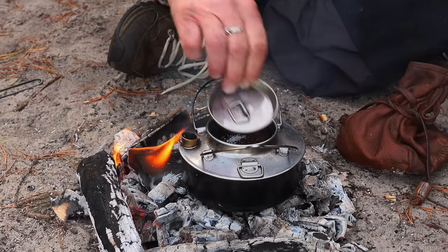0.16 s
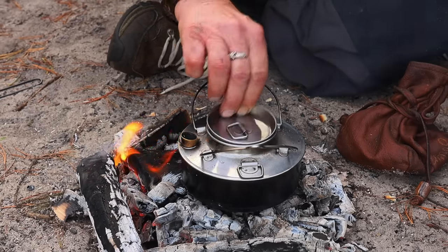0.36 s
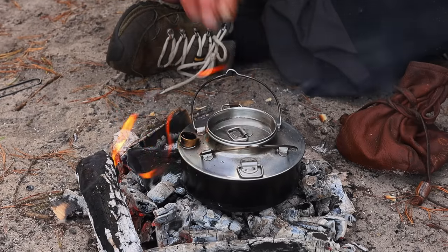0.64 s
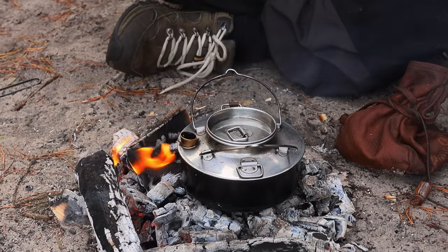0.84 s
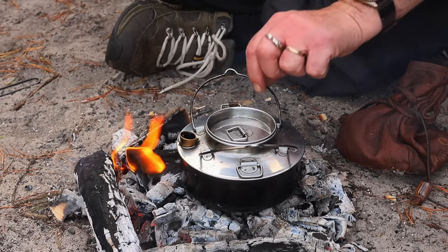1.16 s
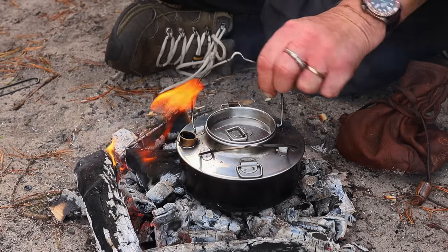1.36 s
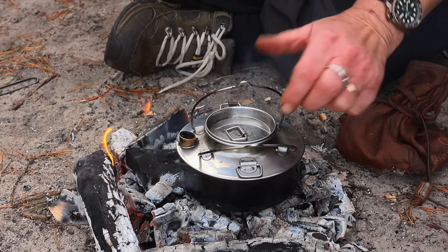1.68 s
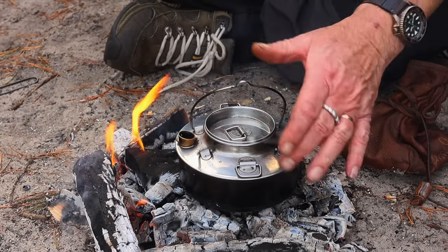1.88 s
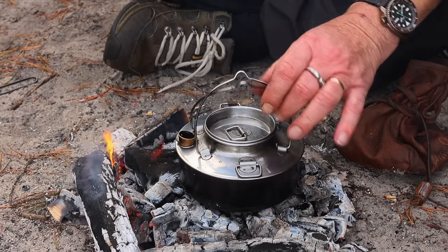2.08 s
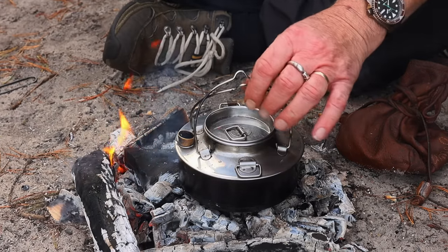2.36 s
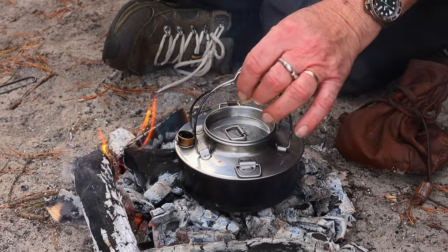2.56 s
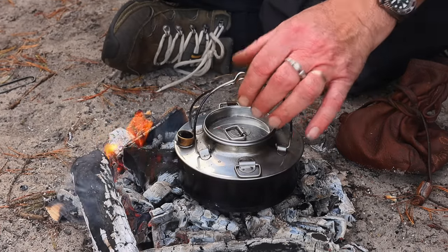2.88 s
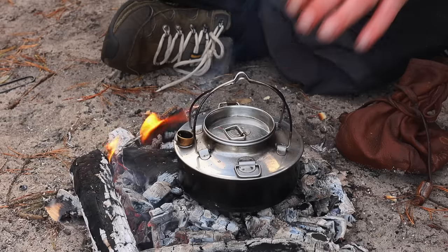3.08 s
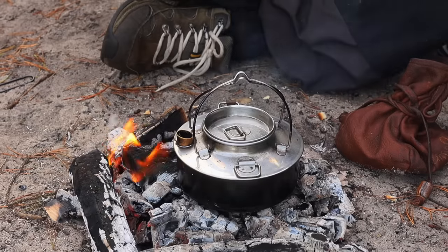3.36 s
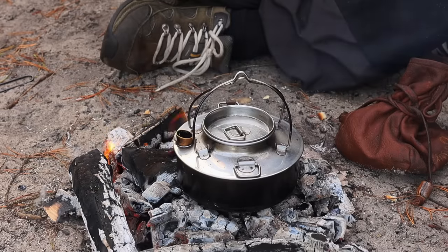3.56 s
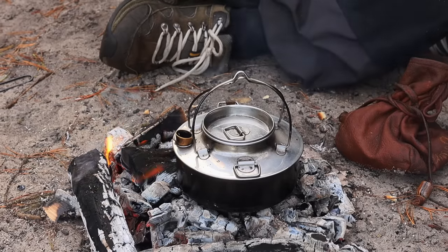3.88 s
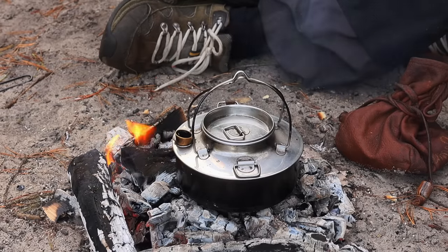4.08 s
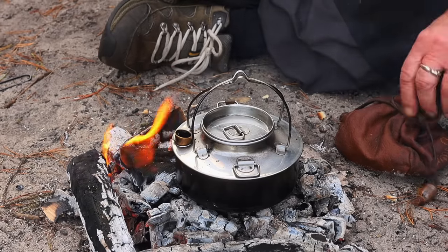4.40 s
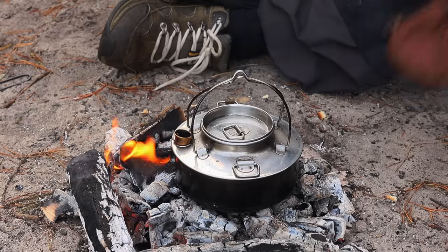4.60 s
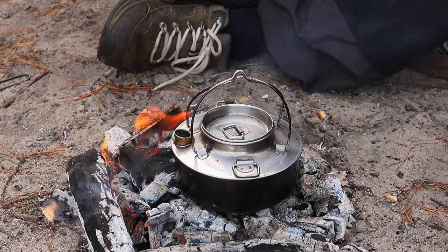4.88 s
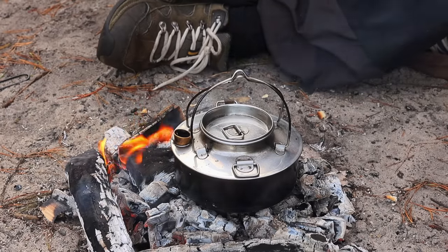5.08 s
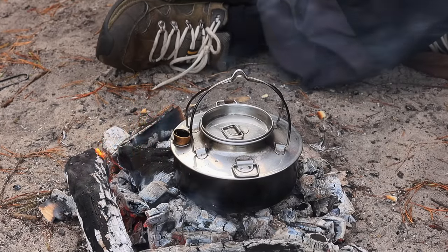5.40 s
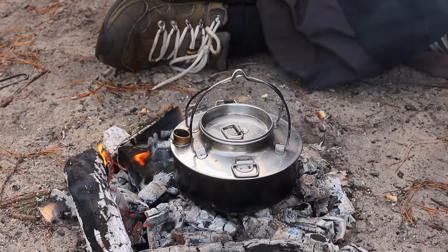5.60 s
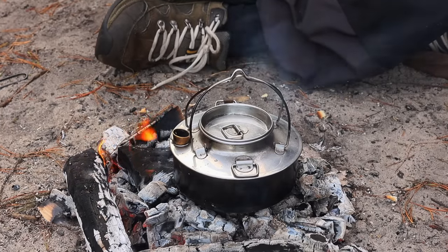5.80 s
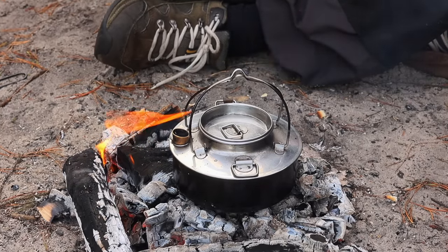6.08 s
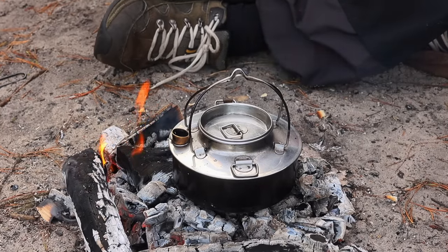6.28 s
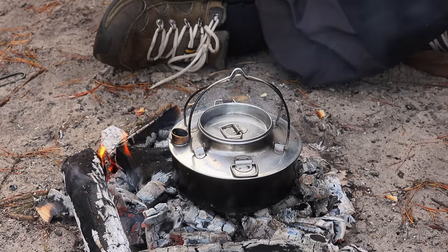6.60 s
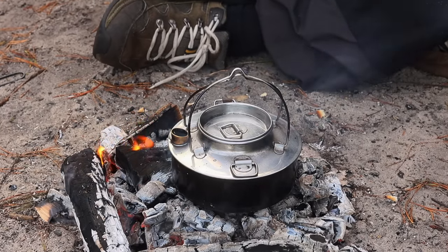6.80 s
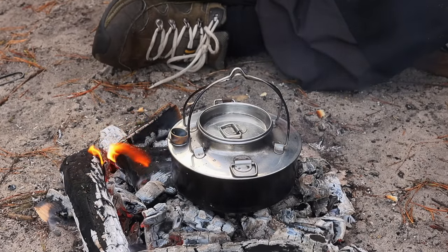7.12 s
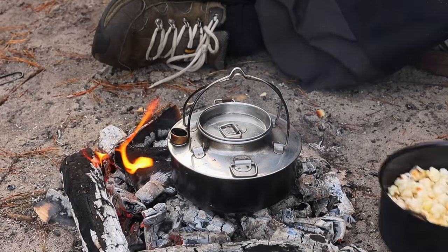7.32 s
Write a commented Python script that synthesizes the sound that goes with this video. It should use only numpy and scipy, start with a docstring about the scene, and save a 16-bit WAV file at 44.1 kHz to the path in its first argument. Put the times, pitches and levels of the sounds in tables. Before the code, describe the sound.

Outdoors, close and dry, one microphone faces a small campfire whose faint hiss, tiny ticks and soft low flame puffs continue throughout, with occasional thin high warbles. A brief cloth rub opens; at 0.27 s a steel lid clanks on a kettle, rattles lightly, then knocks and slides home around 0.46 s with a short rasp and hollow boom. Sleeves rustle at 0.8-1.3 s. Around 2.0-2.1 s the wire handle creaks faintly and clicks sharply, with another tick at 2.5 s and softer ones near 2.75 s. From 3.4 to 4.8 s trousers and a bag rustle, while sharp pops cluster at 3.95-4.5 s. Another rub comes at 5.4 s with deeper flame puffs, then crackles and a pop at 6.1-6.3 s. From 6.75 s until the end near 7.4 s, a metal pot drags over gritty sand, grating and clinking, amid a strong flame puff at 6.85 s.

```python
"""First a rub of cloth close by over a small campfire's faint hiss, then steel knocks of a kettle lid sliding home.
Outdoors, one microphone straight ahead: dense noise makes the cloth and hiss, brief pressure waves the flames.
Noise bursts make the sharp pops and crackles; collisions and friction feed the ringing modes of the kettle.
Its wire handle is flipped up with a faint creak, and at the end a popcorn pot is scraped along on sand."""
import sys
import numpy as np
from scipy import signal
from scipy.fft import rfft, irfft, next_fast_len
from scipy.io import wavfile

SR = 44100
rng = np.random.default_rng(int(sys.argv[2]) if len(sys.argv) > 2 else 0)


def inscribe(sig):
    """Save sig as 16-bit PCM at rate SR to the path in sys.argv[1].

    A 1-D sig is mono; a 2-D sig holds one channel per row.
    Samples are clipped to [-1, 1] before scaling.
    """
    pcm = np.round(np.clip(np.atleast_2d(sig).T, -1, 1) * 32767)
    wavfile.write(sys.argv[1], SR, pcm.astype(np.int16))


N = 328545
SHORT = 8192   # samples in one brief sound
AGE = np.arange(SHORT) / SR   # s since its start
TIME = np.arange(N) / SR   # s since the scene began


def from_db(db):
    """Amplitude for a level in dB."""
    return 10 ** (np.asarray(db) / 20)


def rms_one(x):
    """Scale to an rms of 1."""
    return x / np.sqrt(np.mean(x ** 2) + 1e-20)


def in_time(rows):
    """Columns of a curve, sample by sample."""
    s, *columns = np.transpose(rows)
    return [np.interp(TIME, s, column) for column in columns]


def add(track, s, sound):
    """Mix a sound in at a time."""
    at = int(np.clip(round(s * SR), 0, N - 1))
    track[at:at + len(sound)] += sound[:N - at]


def filtered(x, order, hz, kind):
    """Butterworth filter."""
    return signal.sosfilt(signal.butter(order, hz, kind, fs=SR, output="sos"), x)


def colour(x, points):
    """Causal (minimum-phase) filter through (f/Hz, level/dB) points."""
    size = 2 * next_fast_len(len(x) // 2 + 1)
    hz, db = np.transpose(points)
    bins = np.maximum(np.arange(size // 2 + 1) * SR / size, 1)
    log_gain = np.interp(np.log(bins), np.log(hz), db) * np.log(10) / 20
    cepstrum = irfft(log_gain)
    # folding the cepstrum forward in time gives minimum phase
    cepstrum[1:size // 2] *= 2
    cepstrum[size // 2 + 1:] = 0
    return irfft(rfft(x, size) * np.exp(rfft(cepstrum)))[:len(x)]


# Edges of the five bands that tone a blow (low, mid, high, bright, top): f/Hz
BAND_EDGES_HZ = [200, 800, 2400, 6000, 9500, 16000]


def band_centres(count):
    """Middle pitches of the uppermost bands."""
    edges = np.array(BAND_EDGES_HZ[-count - 1:])
    return np.sqrt(edges[1:] * edges[:-1])


def voiced(x, band_db):
    """Tone a blow toward the given levels in its uppermost bands, as rms over 10 ms."""
    edges = np.array(BAND_EDGES_HZ[-len(band_db) - 1:])
    x = filtered(x, 2, edges[0], "high")
    for _ in range(2):   # the second pass trims what the first left over
        energy = np.add.reduceat(abs(rfft(x)) ** 2, edges * SHORT // SR)[:-1]
        power = energy * 2 / SHORT / (.01 * SR)
        correction_db = band_db - 10 * np.log10(power + 1e-20)
        x = colour(x, np.transpose([band_centres(len(band_db)), correction_db]))
    return x


def blow_bands(colour_db, db, tilt, thump_db):
    """A harder contact tilts the shared colour toward the treble; a heavier one adds thump."""
    hz = band_centres(count=4)
    upper_db = np.array(colour_db) + tilt * np.log2(hz / hz[1])
    return db + np.append(thump_db, upper_db)


def drift(rate):
    """Smooth chance with a spread of about 1, through `rate` random knots a second."""
    knots = rng.standard_normal(8192)
    return 1.2 * np.interp(TIME * rate, np.arange(len(knots)), knots)


def noise(spectrum):
    """Steady noise of rms 1."""
    return rms_one(colour(rng.standard_normal(N), spectrum))


def dying(t60):
    """Envelope that falls 60 dB in t60."""
    return from_db(-60 * AGE / t60)


def fracture(crack_t60, scatter_db, scatter_t60):
    """A sudden split, followed by its scatter off logs, kettle and ground."""
    envelope = dying(crack_t60) + from_db(scatter_db) * dying(scatter_t60)
    return rng.standard_normal(SHORT) * envelope


def struck(modes, t60_scale):
    """Ring of all modes set off together, each a dying sine."""
    return sum(from_db(db) * dying(t60 * t60_scale) * np.sin(2 * np.pi * hz * AGE)
               for hz, db, t60 in modes)


def driven(drive, ring):
    """Response to a lasting drive, with the ring scaled to unit energy."""
    return signal.fftconvolve(drive, ring / np.linalg.norm(ring))[:N]


def singing(rows, waver_hz, shimmer_db, rate):
    """A narrow resonance, unsteady in pitch and strength: rows of (t/s, f/Hz, level/dB)."""
    hz, db = in_time(rows)
    sounding = (TIME >= rows[0][0]) & (TIME <= rows[-1][0])
    phase = 2 * np.pi * np.cumsum(hz + waver_hz * drift(rate)) / SR
    strength = from_db(db + shimmer_db * np.minimum(drift(rate), 1))
    return sounding * strength * np.sqrt(2) * np.sin(phase)


# a tone's rise and fade as shares of its length; how far below its top it starts and ends
TONE_ATTACK_SHARE, TONE_RELEASE_SHARE, TONE_EDGE_DB = 0.28, 0.21, 15


def tones(rows, waver_hz, shimmer_db, rate):
    """Each rough tone rises, holds and fades while its pitch glides evenly."""
    shares = np.array([0, TONE_ATTACK_SHARE, 1 - TONE_RELEASE_SHARE, 1])
    edges = TONE_EDGE_DB * np.array([1, 0, 0, 1])
    out = np.zeros(N)
    for s, length, first, last, db in rows:
        curve = np.transpose([s + length * shares, first + (last - first) * shares, db - edges])
        out += singing(curve, waver_hz, shimmer_db, rate)
    return out


def rubbing(rubs):
    """Strength of scuff, middle and swish over time: every rub is a lopsided bell."""
    t = np.arange(0, N, 32) / SR
    power = np.zeros((3, 1))
    for s, swell_s, fade_s, db, scuff_db, swish_db in rubs:
        bell = np.exp(-((t - s) / np.where(t < s, swell_s, fade_s)) ** 2)
        part_db = db + np.array([[scuff_db], [0], [swish_db]])
        power = power + (from_db(part_db) * bell) ** 2
    return [np.interp(TIME, t, np.sqrt(p)) for p in power]


# Spectra of a rub's low scuff, middle and high swish: f/Hz, relative level/dB per Hz
RUB_LOW = [(30, -1.5), (120, -2), (300, 7), (600, 3.5), (1200, -11), (3000, -44), (16000, -60)]
RUB_MID = [(30, -85), (450, -4), (950, 2), (1700, 3), (3000, -1), (4500, -8), (16000, -54)]
RUB_HIGH = [(30, -8), (2000, -4.5), (3700, -3), (5800, 2), (7200, -3.5), (8400, 3.5), (9600, -7.5),
            (13000, -5.5), (16000, -16)]


def slipping(strengths, grain_db, clump_db, grit):
    """Dense, fine grains in uneven clumps, plus any grit, heard as scuff, middle and swish."""
    grains = from_db(grain_db * signal.resample(rng.standard_normal(N // 60), N))
    out = np.zeros(N)
    for strength, spectrum in zip(strengths, (RUB_LOW, RUB_MID, RUB_HIGH)):
        clumps = from_db(clump_db * drift(110))
        slips = grains * clumps * rng.standard_normal(N) + grit
        out += strength * rms_one(colour(slips, spectrum))
    return out


# Spectrum of the glowing bed: f/Hz, relative level/dB per Hz
FIRE = [(15, -66), (25, -2.5), (66, -1), (102, -1), (451, -9.5), (489, -8.5), (545, -9.5), (677, -5),
        (734, -6), (1400, -8), (2840, -13), (4740, -14.5), (6050, -19.5), (7510, -17), (16000, -20)]
FIRE_DB, SIZZLE_DB = -55, -71


def hiss():
    """The glowing bed hisses and sizzles faintly, each level wavering."""
    bed = from_db(FIRE_DB + 0.69 * drift(6.9)) * noise(FIRE)
    sizzle_spectrum = [(30, -52), (6500, -17), (7700, 14), (8500, -18), (9500, -32), (16000, -48)]
    sizzle = from_db(SIZZLE_DB + 1.9 * drift(22)) * noise(sizzle_spectrum)
    return bed + sizzle


# Spurts of a thin warble far above the hiss:
# t/s, length/s, first f/Hz, last f/Hz, level/dB (before level_db)
WHISTLES = [(0.03, 0.17, 7640, 7700, -63.5), (0.5, 0.13, 7660, 7600, -59), (1.48, .15, 8650, 8650, -68),
            (3.43, 0.086, 7800, 7900, -69), (4.05, .14, 7800, 7650, -67), (4.3, .2, 7700, 7650, -64),
            (4.69, .12, 7650, 7750, -65)]


def whistle(level_db=5.5):
    """Unsteady sine tones warble thin and high."""
    return from_db(level_db) * tones(WHISTLES, waver_hz=141.0, shimmer_db=2.5, rate=260)


def puff(hz):
    """A pocket of gas ignites: pressure swells, flips to suction and settles."""
    phase = (AGE[:SHORT // 4] - 1 / hz) * 2 * np.pi * hz
    return -2.4 * phase / (1 + phase ** 2 / 0.71) ** 1.57 * np.exp(-(phase / 5) ** 2)


# The larger puffs of flame: t/s, peak level/dB (before level_db and the low cut), f/Hz
PUFFS = [(0.663, -35, 125), (0.691, -35.5, 141), (0.807, -36, 140), (1.498, -31, 121), (1.577, -39, 137),
         (1.667, -35, 165), (1.787, -30, 107), (2.637, -34, 192), (2.798, -35, 134), (2.977, -30.5, 175),
         (3.012, -33.5, 120), (3.125, -33, 150), (3.237, -36.5, 138), (3.65, -38, 110), (3.763, -32, 198),
         (3.996, -42, 210), (5.382, -27, 134), (5.48, -26, 101), (5.619, -35.5, 144), (5.706, -32, 190),
         (6.626, -37, 116), (6.849, -21.5, 259), (7.001, -27.5, 160), (7.315, -31, 120)]
AFTER_PUFF_LOSS_DB, AFTER_PUFF_S = 9.5, 0.035   # how much weaker and about how much later


def flames(level_db=-1, flutter_per_s=26, flutter_db=-53.0, lowest_hz=55):
    """Each large puff draws a smaller one after it, over a steady flutter of tiny ones."""
    out = np.zeros(N)
    for (s, db, hz), (wait, pitch) in zip(PUFFS, rng.random((len(PUFFS), 2))):
        add(out, s - 1 / hz, from_db(db + level_db) * puff(hz))
        after = from_db(db + level_db - AFTER_PUFF_LOSS_DB) * puff(hz * 2 ** (pitch - .5))
        add(out, s + AFTER_PUFF_S * (wait + .5), after)
    for when, size, pitch in rng.random((int(flutter_per_s * N / SR), 3)):
        add(out, when * N / SR, from_db(flutter_db + 14.4 * size ** 2) * puff(70 * 3 ** pitch))
    return filtered(out, 1, lowest_hz, "high")


def faint_ticks(per_s=16, level_db=-45, spread_db=4):
    """Tiny splits at random moments, each with a pitch of its own."""
    out = np.zeros(N)
    age = AGE[:400]
    for when, size, pitch in rng.random((int(per_s * N / SR), 3)):
        hz = 2500 * 4 ** pitch
        tick = rng.standard_normal(400) * .5 + np.sin(2 * np.pi * hz * age)
        strength = from_db(level_db - spread_db * np.log(max(size, .05)))   # a few stand out
        add(out, when * N / SR, strength * tick * dying(t60=0.0044)[:400])
    return out


# Sleeves, trousers and bag close by; grip gives a low scuffing, speed a high swish:
# peak t/s, swell/s, fade/s, level/dB (before level_db), scuff and swish/dB above the level
CLOTH_RUBS = [(0.02, .1, 0.096, -53.5, -10, -3), (0.77, 0.1, 0.19, -51, -9, -7.5),
              (0.96, 0.085, 0.14, -49, -18, -6.5), (1.27, 0.1, 0.059, -63.5, 3, 3),
              (1.72, 0.049, 0.15, -74, 14, 5), (2.1, 0.11, 0.38, -79, 12, 6),
              (2.75, 0.044, .08, -63.5, 4, -1), (3.03, 0.19, 0.051, -62.5, 1, 17),
              (3.425, 0.042, 0.21, -56.5, -3, 5.5), (3.61, 0.046, 0.059, -53, -12, 4),
              (3.71, 0.065, 0.1, -53, -7.5, 8.5), (3.844, 0.031, 0.069, -42, -8.5, -5.5),
              (3.96, 0.095, 0.14, -47.5, 1.5, -1.5), (4.29, 0.12, 0.077, -48, -2.5, -5.5),
              (4.5, 0.13, 0.11, -50, -3.5, -4), (4.78, 0.16, .2, -59, -18, -3),
              (5.373, 0.012, 0.1, -44.5, 0, -2.5), (5.61, 0.028, 0.035, -61.5, 12.5, 3),
              (5.71, 0.051, 0.15, -55, -1.5, -6), (6.55, 0.42, 0.6, -65, 4.5, 0)]
# clothes never lie quite still (levels before level_db)
STIR_SCUFF_DB, STIR_MIDDLE_DB, STIR_SWISH_DB, STIR_SWING_DB = -65, -71.5, -66, 2


def rustle(level_db=0.5):
    """Cloth slips in separate rubs over a faint, constant stirring."""
    swing = STIR_SWING_DB * drift(3.65)
    stir_db = (STIR_SCUFF_DB, STIR_MIDDLE_DB, STIR_SWISH_DB)
    strengths = [np.hypot(rub, from_db(db + swing)) for rub, db in zip(rubbing(CLOTH_RUBS), stir_db)]
    return from_db(level_db) * slipping(strengths, grain_db=1.5, clump_db=1.4, grit=0)


# The louder ticks of embers and of a hand on the handle: t/s, level/dB (before level_db), f/Hz
CRACKLES = [(0.0935, -49, 10000), (0.6662, -49, 7000), (0.7633, -41, 6200), (1.2822, -39.5, 5550),
            (1.2921, -39, 2600), (1.3061, -45, 1620), (1.5138, -48, 6100), (1.836, -47.5, 4150),
            (1.957, -47.5, 7800), (2.2034, -41.5, 4800), (2.3943, -53, 2970), (3.4795, -49, 5040),
            (3.5275, -42, 4700), (3.8068, -35.5, 7200), (3.8465, -41.5, 3580), (3.9551, -29.5, 6840),
            (4.3233, -40.5, 3400), (4.4274, -45, 4000), (4.8269, -49, 3300), (4.9052, -43, 4940),
            (5.2626, -48.5, 5500), (5.2787, -47.5, 6000), (5.6423, -35, 5400), (5.6522, -44.5, 7900),
            (5.8714, -48, 5500), (5.8799, -42.5, 5300), (5.912, -40, 2900), (6.0877, -51, 4000),
            (6.1786, -42.5, 5460), (6.2804, -29.5, 7600), (6.2971, -35.5, 7900), (6.3604, -51, 5230),
            (6.5213, -36, 8900), (6.588, -46.5, 7800)]
# a tick's spectrum falls away on both sides of its pitch
TICK_BELOW_DB_PER_OCTAVE, TICK_ABOVE_DB_PER_OCTAVE = 7, 9.5
# soft ticks reach down from SOFT_TICK_DB over the range, up to an octave either side of SOFT_TICK_HZ
SOFT_TICKS_PER_S, SOFT_TICK_DB, SOFT_TICK_RANGE_DB, SOFT_TICK_HZ = 2.4, -47, 16, 5200
# louder ticks ping for longer: dB of ring time per dB above this level
PING_GROWTH, PING_FROM_DB = 1, -36.5


def crackles(level_db=1.0, ping_hz=8400, ping_db=-10, ping_t60=0.01, top_hz=13500):
    """Charred wood and touched steel give short noise ticks, with a ping strongest in the brightest."""
    out = np.zeros(N)
    chances = rng.random((int(SOFT_TICKS_PER_S * N / SR), 3))
    soft = [(when * N / SR, SOFT_TICK_DB - SOFT_TICK_RANGE_DB * size, SOFT_TICK_HZ * 2 ** (2 * pitch - 1))
            for when, size, pitch in chances]
    for s, db, hz in list(CRACKLES) + soft:
        octaves = np.log2(band_centres(count=4) / hz)
        fall_db = np.maximum(-TICK_BELOW_DB_PER_OCTAVE * octaves, TICK_ABOVE_DB_PER_OCTAVE * octaves)
        band_db = db - fall_db
        ring_s = ping_t60 * from_db(PING_GROWTH * max(db - PING_FROM_DB, 0))
        pitch_hz = ping_hz * (1 + rng.normal(0, 0.023))
        ping = dying(ring_s) * np.sin(2 * np.pi * pitch_hz * AGE)
        brightness_db = min(band_db[2] - band_db[1], 6)
        tick = fracture(crack_t60=.006, scatter_db=-23, scatter_t60=.055)
        tick += from_db(ping_db + brightness_db) * ping
        add(out, s, voiced(tick, band_db))
    return from_db(level_db) * filtered(out, 4, top_hz, "low")


# Sharp bursts from the fire: t/s, pressure wave length/s, level/dB (before level_db and flattening),
# tilt/dB per octave, thump/dB above the level
POPS = [(2.2917, 0.0011, -45.5, -1, -15), (3.2278, 0.001, -40, 0.5, -9), (3.953, 0.00082, -24, -1, -2),
        (4.2876, 0.00055, -29, 1.5, -6.5), (4.4342, .0012, -26, 4, -5.5), (4.4939, 0.00069, -28, 0.5, -4),
        (5.5508, 0.00095, -47, -2, -3), (6.143, .0013, -24.5, 2, -3.5), (7.3885, .0009, -39.5, -1.5, -1.5)]
# Colour all pops share: level/dB in the mid, high, bright and top band
POP_COLOUR_DB = [1.5, 1.5, -8, -9.5]
# Colour of the crack, before the bands are set: f/Hz, level/dB
CRACK_COLOUR = [(500, 0.5), (1200, 2.5), (2300, 1), (3800, -1.5), (5200, 2.5), (6800, -7), (11000, -1),
                (16000, 9)]


def pops(crest=.23, level_db=0.5, top_hz=12500):
    """Trapped steam bursts: one steep N-shaped pressure wave, then the crack; the peaks are flattened."""
    out = np.zeros(N)
    for s, push_s, *blow in POPS:
        wave = -1.5 * (1 - 2 * AGE / push_s) * (AGE < push_s)
        crack = fracture(crack_t60=.012, scatter_db=-12, scatter_t60=.038)
        crack *= AGE > push_s * .4   # it opens during the wave
        burst = voiced(wave + colour(crack, CRACK_COLOUR), blow_bands(POP_COLOUR_DB, *blow))
        add(out, s, crest * np.tanh(from_db(level_db) * burst / crest))
    return filtered(out, 8, top_hz, "low")


# Colour all steel blows share: level/dB in the mid, high, bright and top band
STEEL_COLOUR_DB = [-3.5, 0, -1.5, -10]


def metal(knocks, modes, clack_db, chatter_per_s, ring_scale, level_db):
    """Each contact is a run of tiny collisions that set the steel ringing; the lows come mostly from its modes."""
    out = np.zeros(N)
    for s, contact_s, ring_db, *blow in knocks:
        ring = np.zeros(SHORT)
        for hz, db, t60 in modes:
            strength = from_db(db + 2 * rng.standard_normal())
            phase = 2 * np.pi * hz * AGE + rng.uniform(0, 2 * np.pi)
            ring += strength * dying(t60 * ring_scale) * np.sin(phase)
        clack = fracture(crack_t60=0.0013, scatter_db=-13.5, scatter_t60=0.06)
        clack = from_db(clack_db) * filtered(clack, 2, 900, "high")
        touches = (rng.random(SHORT) < chatter_per_s / SR) * rng.standard_normal(SHORT) * .5
        touches[0] = 1   # the first collision
        touches *= np.exp(-(AGE / contact_s) ** 2 / 2)
        hit = signal.fftconvolve(touches, from_db(ring_db) * ring + clack)[:SHORT]
        add(out, s, voiced(hit, blow_bands(STEEL_COLOUR_DB, *blow)))
    return from_db(level_db) * out


# Scrapes and clinks of the popcorn pot: t/s, contact/s, ring/dB, level/dB (before level_db),
# tilt/dB per octave, thump/dB above the level
POT_KNOCKS = [(7.209, 0.0077, -7, -37, -2, -2), (7.3, .0018, -22, -40, 5, -18),
              (7.314, 0.019, -19, -48, 14, 10.5), (7.3295, 0.0028, -7, -36.5, -9.5, 1.5),
              (7.3605, 0.0034, -8.5, -34, 5.5, -28)]
# Ringing modes of the pot: f/Hz, level/dB, t60/s (before any ring scaling)
POT_MODES = [(1110, -33, 0.048), (2104, -7, 0.08), (4984, -1.5, .2), (5030, 9, 0.03), (6600, -24, .1),
             (8830, 2, 0.11), (8947, -12, 0.14), (9400, -8, .1), (11860, 1, 0.12), (12600, 0, 0.076)]


def pot_knocks():
    """Brief contacts set the pot's modes ringing."""
    return metal(POT_KNOCKS, POT_MODES, clack_db=9.5, chatter_per_s=3000, ring_scale=0.72, level_db=-0.5)


# The pot shoved over the sand:
# peak t/s, swell/s, fade/s, level/dB (before sand_db), scuff and swish/dB above the level
SAND_RUBS = [(6.768, 0.011, 0.017, -48.5, 8, -1), (6.875, 0.034, 0.028, -48, 1.5, -4.5),
             (6.94, 0.045, 0.13, -41, -4.5, 1.5), (7.12, 0.088, 0.11, -48, -1.5, -1.5),
             (7.24, 0.072, 0.18, -42, -15, -5), (7.33, 0.015, 0.0082, -30, -19, -8.5),
             (7.37, 0.14, 0.075, -46.5, -4, -1.5)]
# The pot grates as it is dragged: t/s, length/s, first f/Hz, last f/Hz, level/dB (before level_db)
POT_GRATES = [(6.755, 0.022, 430.4, 473, -41.5), (6.785, 0.062, 525, 520, -45),
              (6.9, .1, 1513, 1495, -42.5), (7.15, 0.058, 569, 806, -44), (7.205, 0.057, 950, 1114, -41.5),
              (7.365, .06, 5020, 5000, -46)]
POT_RING_DB = -19   # how strongly the sand sets the pot ringing


def pot_drag(level_db=-3.0, sand_db=2.5, grit_per_s=110, grit_db=27):
    """Coarse sand snaps under the pot and sets it ringing; its base sticks and slips in rough, gliding tones."""
    snaps = (rng.random(N) < grit_per_s / SR) * rng.uniform(-0.58, 1, N)
    grit = from_db(grit_db) * snaps
    sand = from_db(sand_db) * slipping(rubbing(SAND_RUBS), grain_db=1.5, clump_db=1.4, grit=grit)
    body = from_db(POT_RING_DB) * driven(sand, struck(POT_MODES, t60_scale=1))
    grating = from_db(level_db) * tones(POT_GRATES, waver_hz=118.3, shimmer_db=8.0, rate=360)
    return sand + body + grating


# The handle creaks faintly in its lugs as it is swung up:
# t/s, length/s, first f/Hz, last f/Hz, level/dB (before level_db)
HANDLE_CREAKS = [(2.02, 0.284, 2400, 2470, -59.5)]


def handle_creak(level_db=-3):
    """A rough, unsteady tone rises slightly in pitch."""
    return from_db(level_db) * tones(HANDLE_CREAKS, waver_hz=110.4, shimmer_db=8, rate=430)


# Lid and handle on the kettle: t/s, contact/s, ring/dB, level/dB (before level_db),
# tilt/dB per octave, thump/dB above the level
KETTLE_KNOCKS = [(0.2684, 0.0016, -9, -17, -4, -17), (0.296, 0.0036, -7, -31, -8, -9),
                 (0.31, .0074, -20, -34.5, -3, -17), (0.337, 0.023, -12, -34.5, -3, -8),
                 (0.3738, .0052, -25, -33, 1, -13), (0.391, 0.0039, -12, -35.5, 0, -14),
                 (0.4176, .003, -20, -39.5, 3.5, -18), (0.426, 0.013, -11, -39, -3, -2),
                 (0.4625, 0.00085, -8, -16.5, 1, -8), (0.4735, 0.0014, 15, -20.5, -1, -19),
                 (1.932, .0015, -4, -47.5, -4.5, -1), (2.1097, 0.0021, 12, -41.5, 2, -10),
                 (2.1144, 0.0067, -15, -22.5, 0.5, -38), (2.118, 0.00033, -4, -21, 0.5, -8),
                 (2.1285, .0037, -16.5, -31, 3.5, 1), (2.1365, 0.0036, -12, -36, 4.5, -13),
                 (2.5068, 0.0024, -7, -30, 3, -10), (2.7275, 0.0016, -26.5, -49, -3, 0),
                 (2.741, 0.0074, -16, -47.5, -1, -18), (2.7745, 0.002, -11, -38, 0, -8)]
# Ringing modes of the kettle: f/Hz, level/dB, t60/s (before ring scaling)
KETTLE_MODES = [(273, -7, 0.04), (445, -5, 0.058), (573, -19, 0.13), (900, -25, 0.045),
                (1110, -11.5, 0.043), (1380, -9, 0.082), (1420, -15, 0.062), (1680, 5, 0.027),
                (1966, 2.5, 0.059), (2490, 2, 0.015), (2730, 0, 0.087), (3020, -6, 0.047),
                (2940, 13, 0.015), (3380, -13, 0.13), (3840, -13, 0.08), (4120, -7, 0.042),
                (4500, -20, 0.18), (4470, -10, 0.054), (5290, 7.5, 0.028), (5800, -15, 0.078),
                (6350, 1, 0.029), (7100, -25, .06), (7700, 8, 0.053), (8260, 11.5, 0.033),
                (8600, 11, 0.023), (8620, -1, 0.064), (10030, -4, 0.057), (12350, 3, 0.045),
                (13500, -10, 0.05), (14500, -38, .05)]


def kettle_knocks():
    """Lid and handle strike the kettle and set its modes ringing."""
    return metal(KETTLE_KNOCKS, KETTLE_MODES, clack_db=11.5, chatter_per_s=2000, ring_scale=0.67, level_db=-2.5)


# The lid slides down into its collar: t/s, friction level/dB (before level_db)
LID_SLIDE = [(.442, -87), (.448, -32.5), (0.456, -26), (.463, -18.5), (.477, -31), (.487, -23), (.497, -28),
             (.512, -47.5), (.55, -100)]
# The air in the kettle booms, sinking in pitch as the lid closes the gap: t/s, f/Hz, level/dB
KETTLE_AIR = [(.418, 647, -70), (.428, 624, -38), (.441, 606, -49), (.459, 617, -29.5), (.468, 493, -32),
              (.485, 434, -27.5), (.505, 421, -50), (.54, 414, -58)]
# the rim's level at the hardest rub; it changes by RIM_FOLLOWS dB per dB of friction
RIM_HZ, RIM_DB, RIM_LAG_S, RIM_FOLLOWS = 4346, -13, .001, 1.6


def lid_slide(grain_db=3.5, direct_db=-9, level_db=-1):
    """Steel rubs on steel: gritty friction feeds the kettle's modes, the rim sings and the enclosed air booms."""
    friction_db = in_time(LID_SLIDE)[0] + grain_db * (drift(900) - .5)
    friction = from_db(friction_db) * rng.standard_normal(N)
    body = driven(friction, struck(KETTLE_MODES, t60_scale=.7))
    rasp = colour(friction, [(30, -7), (170, 3.5), (260, 12), (380, 21), (700, 6.0), (1500, 7),
                             (3200, 25), (6500, 6.5), (8500, 16.5), (10000, 7), (16000, -9)])
    rub = from_db(level_db) * (body / np.sqrt(2) + from_db(direct_db) * rasp)
    hardest = max(db for _, db in LID_SLIDE)
    rim_curve = [(s + RIM_LAG_S, RIM_HZ, RIM_DB + RIM_FOLLOWS * (db - hardest)) for s, db in LID_SLIDE]
    rim = singing(rim_curve, waver_hz=30.5, shimmer_db=3.5, rate=160)
    air = singing(KETTLE_AIR, waver_hz=30, shimmer_db=2.5, rate=140)
    return rub + rim + air


def outdoors(x, echo_db=-31, t60=0.19):
    """Ground and trees return only a faint, airy scatter, bright on top and thin in the middle."""
    scatter = rng.standard_normal(SHORT) * dying(t60) * (AGE > .008)
    tail = colour(scatter, [(200, -5), (3000, -14), (12000, 2)])
    return x + from_db(echo_db) * driven(x, tail)


def scene():
    """Everything lies close together, straight ahead: both channels carry the same sound."""
    kettle = kettle_knocks() + lid_slide() + handle_creak()
    pot = pot_knocks() + pot_drag()
    scattered = outdoors(kettle + pot + pops() + crackles())
    sound = scattered + faint_ticks() + flames() + hiss() + whistle() + rustle()
    return np.array([sound, sound])


def record(dry):
    """At the microphone the highest peaks are rounded and the top is cut steeply."""
    rounded = .9 * np.tanh(dry / .9)
    # order 10, 0.1 dB ripple, 80 dB stopband rejection, passband edge at 15.9 kHz
    return signal.sosfilt(signal.ellip(10, .1, 80, 15900, fs=SR, output="sos"), rounded)


dry = scene()
out = record(dry)
inscribe(out)
```